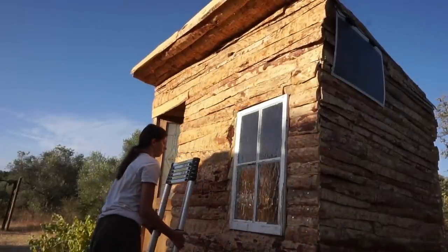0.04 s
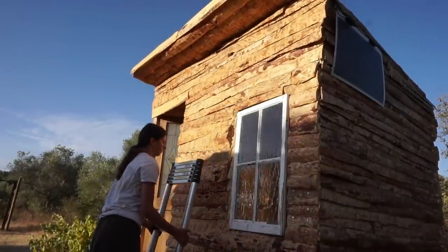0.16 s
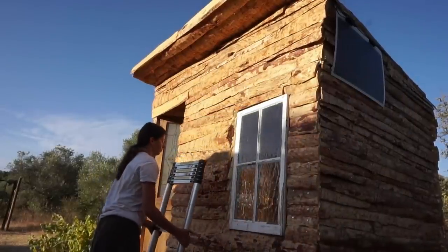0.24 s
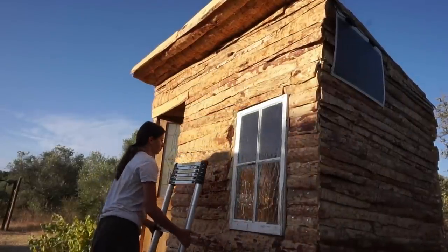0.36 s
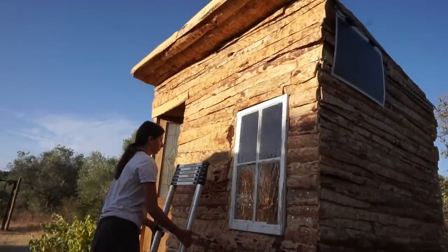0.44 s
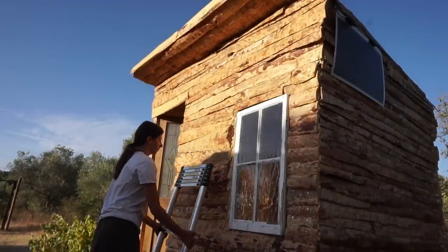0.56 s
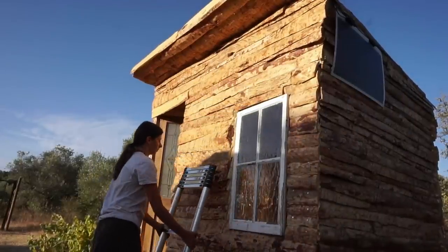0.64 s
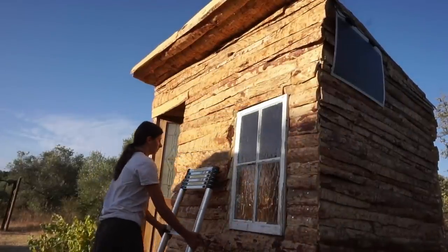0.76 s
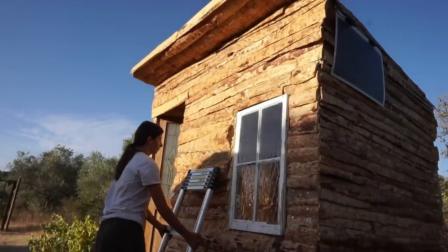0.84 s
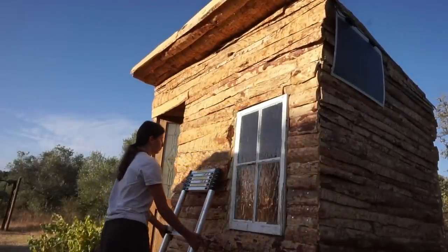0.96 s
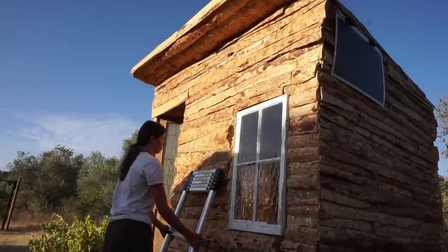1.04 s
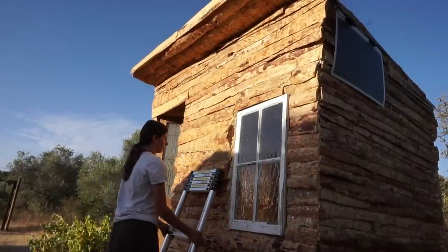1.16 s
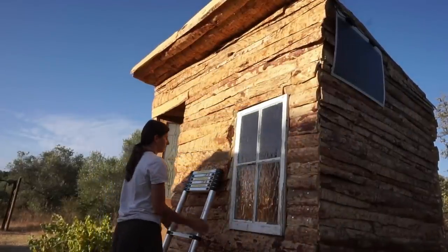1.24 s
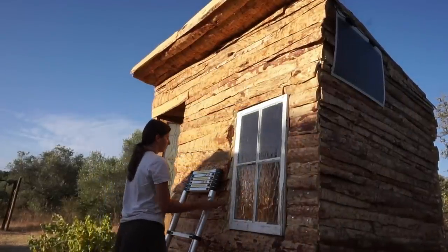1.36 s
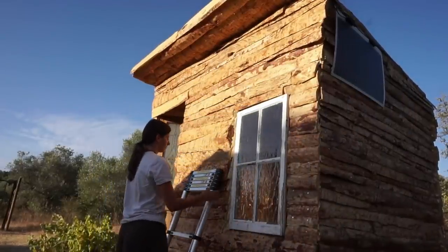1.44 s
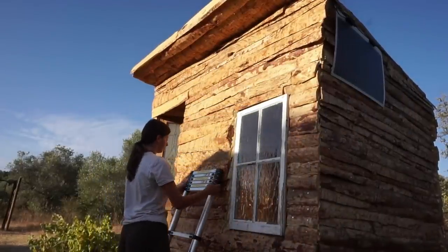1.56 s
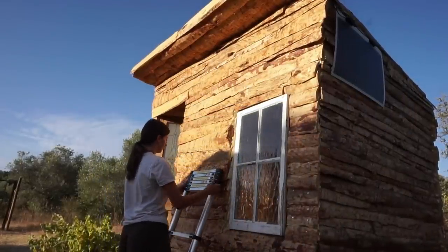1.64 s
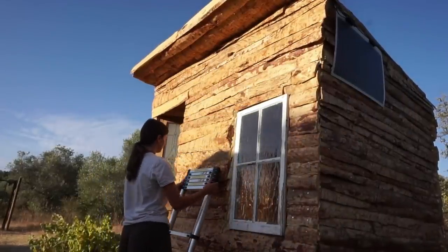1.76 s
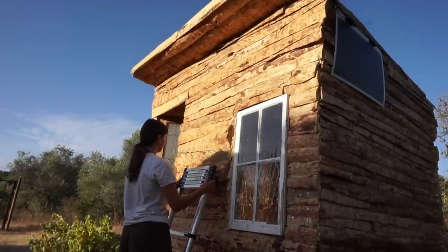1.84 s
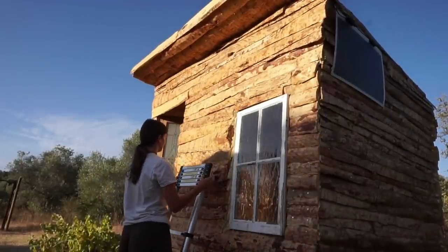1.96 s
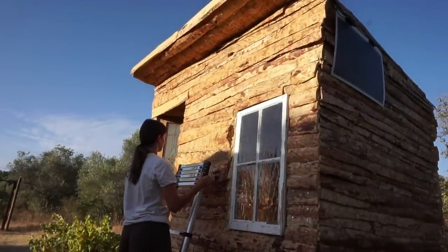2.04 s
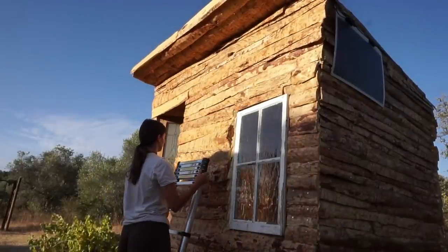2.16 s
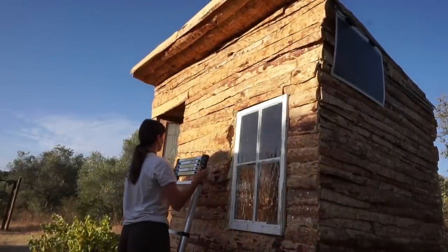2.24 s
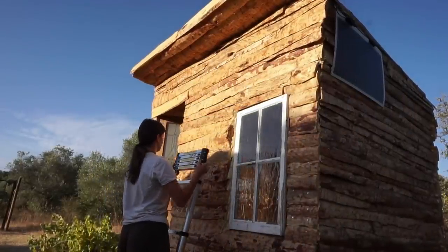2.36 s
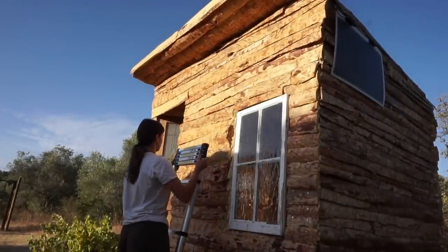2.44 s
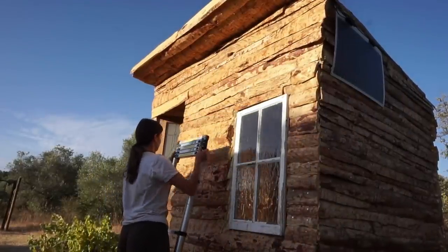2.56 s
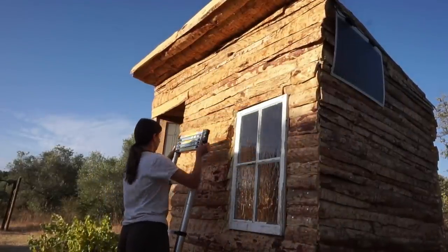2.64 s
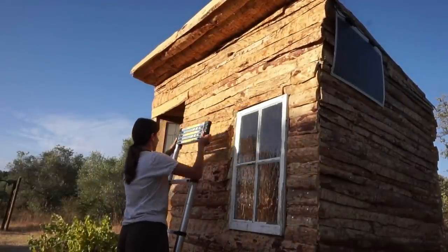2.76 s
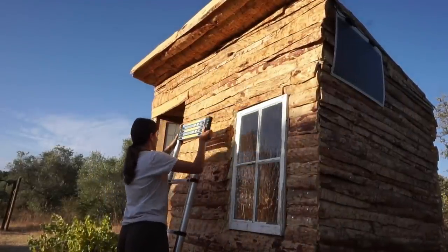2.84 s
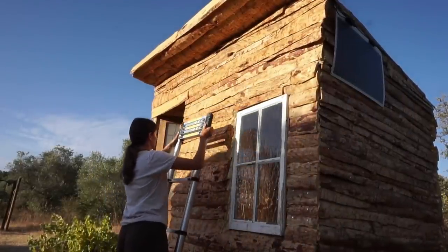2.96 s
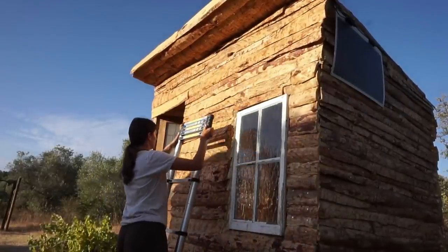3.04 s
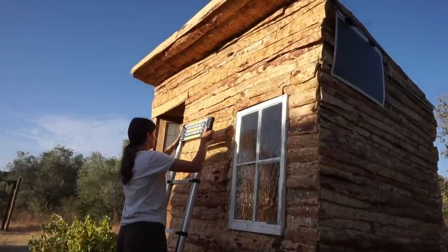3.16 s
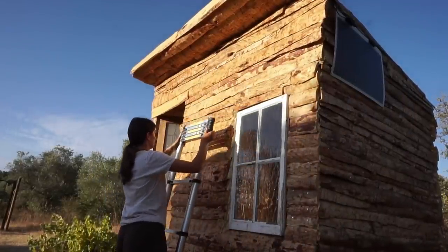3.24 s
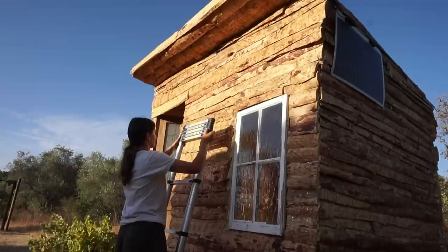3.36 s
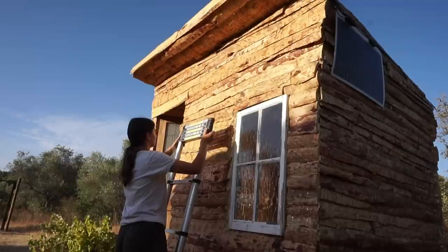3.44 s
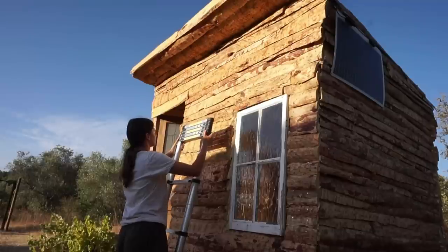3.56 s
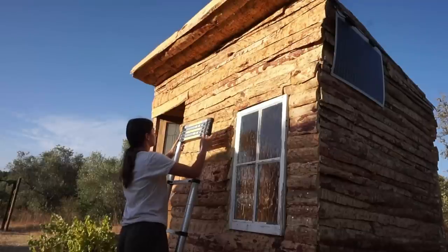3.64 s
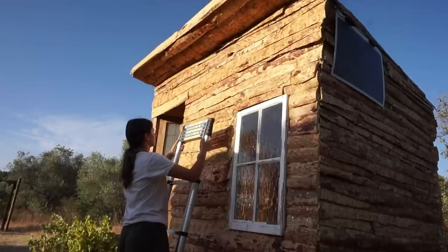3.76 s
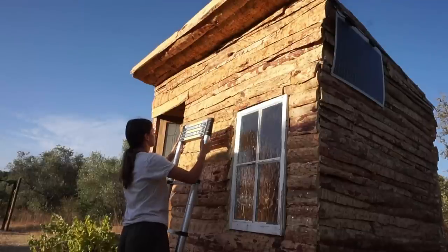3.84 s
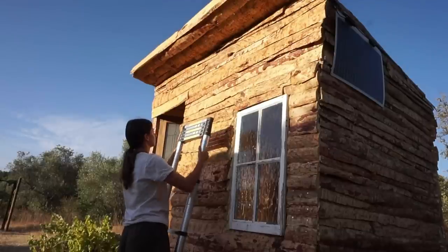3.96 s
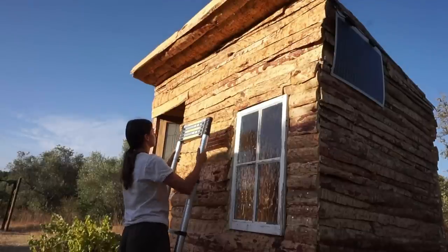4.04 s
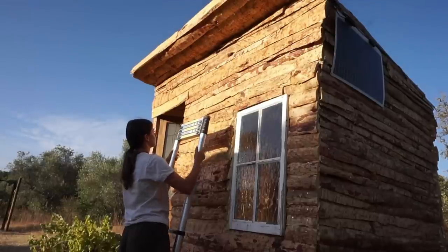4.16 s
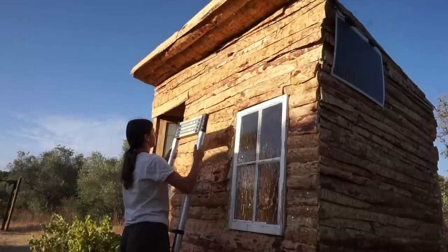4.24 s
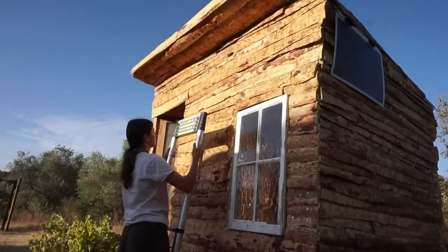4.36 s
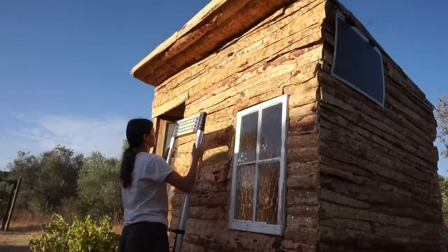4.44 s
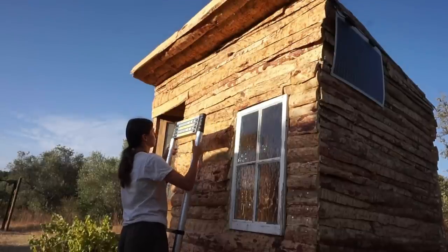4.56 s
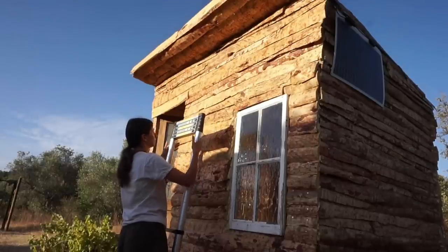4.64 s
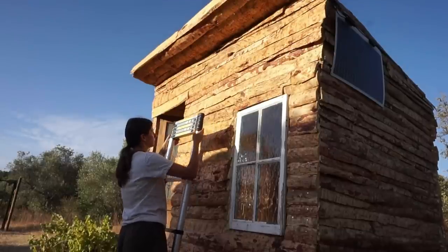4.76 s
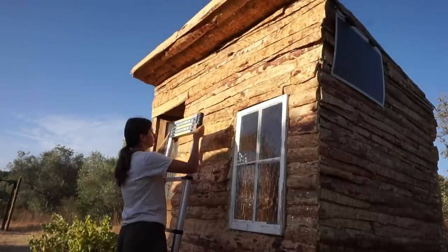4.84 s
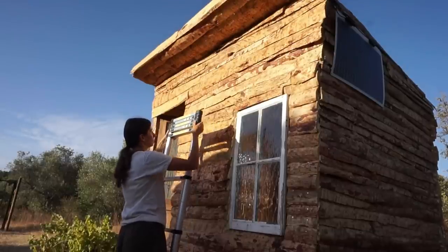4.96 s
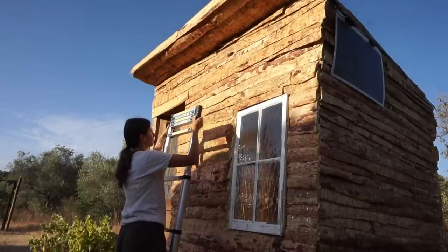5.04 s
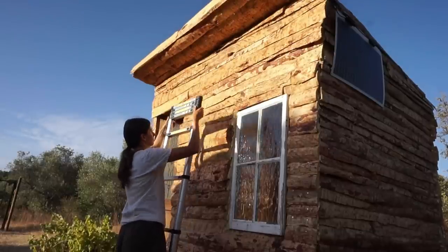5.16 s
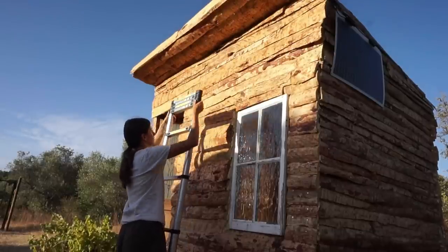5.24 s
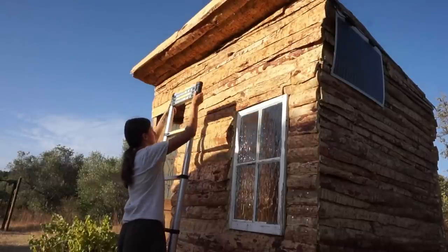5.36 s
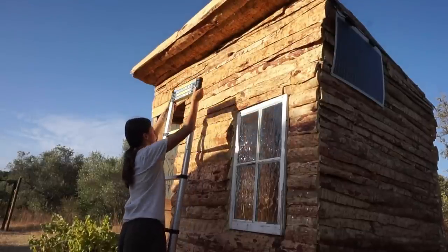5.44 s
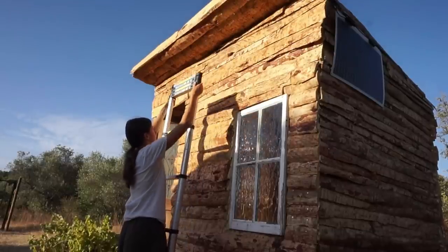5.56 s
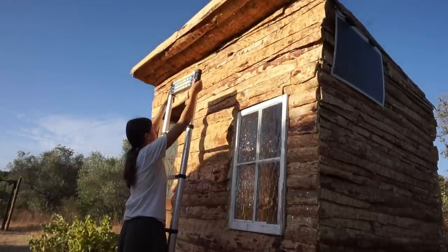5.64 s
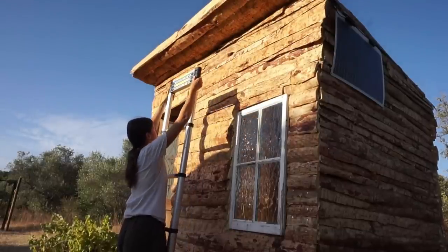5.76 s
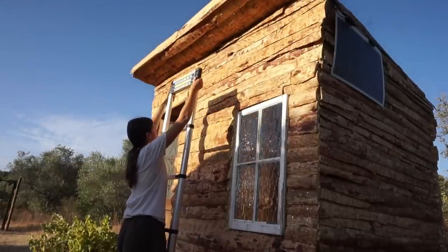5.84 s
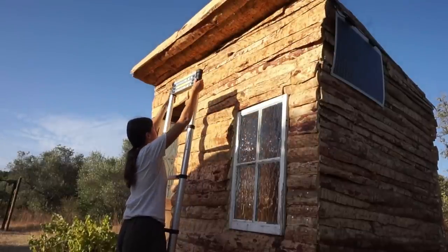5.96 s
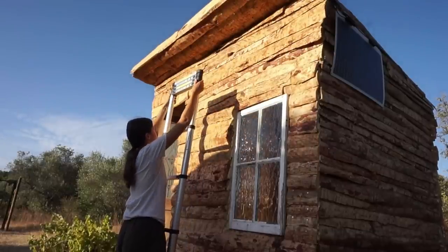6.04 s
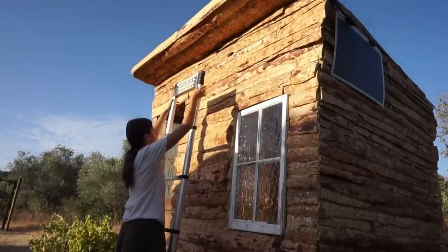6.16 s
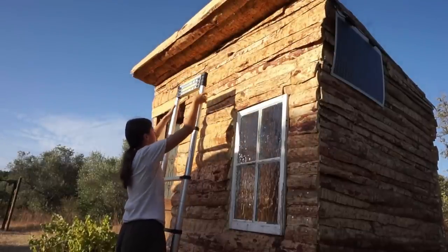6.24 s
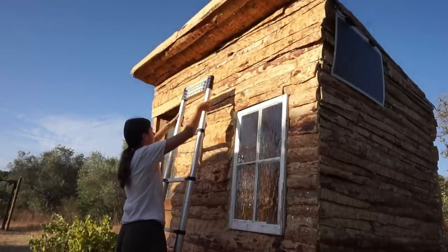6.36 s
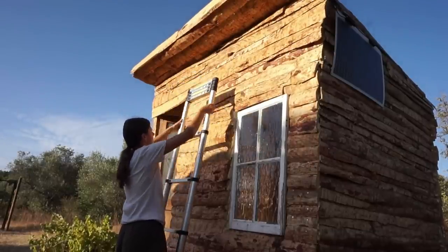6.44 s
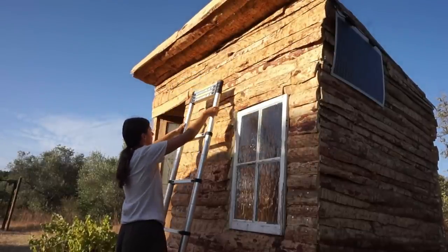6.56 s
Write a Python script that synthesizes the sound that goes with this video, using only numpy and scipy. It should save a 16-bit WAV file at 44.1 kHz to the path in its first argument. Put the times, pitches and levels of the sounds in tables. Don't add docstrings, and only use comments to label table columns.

```python
import sys
import numpy as np
from scipy import signal
from scipy.fft import rfft, irfft, next_fast_len
from scipy.io import wavfile
from scipy.ndimage import uniform_filter1d, map_coordinates

SR = 44100
rng = np.random.default_rng(int(sys.argv[2]) if len(sys.argv) > 2 else 0)


def volts(x):
    e = np.asarray(x, float) / 20
    return 10 ** e


def store_wav(level_fs):
    pcm = np.round(np.clip(np.atleast_2d(level_fs), -1, 1) * 32767)
    wavfile.write(sys.argv[1], SR, pcm.T.astype(np.int16))


N = 291060

# f/Hz, density/dB per Hz
FIELD_COLOUR = [(12, -49), (20, -25), (182, 0), (513, -5), (873, -9.5), (3160, -20), (13900, -26.5),
                (16000, -30)]
# t/s, level/dB
BREEZE = [(0, -65), (.4, -69), (1, -76), (1.3, -60.5), (1.9, -84.5), (2.95, -71), (3.05, -63.5),
          (3.9, -67.5), (5.3, -56.5), (6.1, -61), (6.6, -74)]
# f/Hz, density/dB per Hz
RUMBLE_COLOUR = [(12, -39), (20, -5.5), (65, 1), (103, 0), (171, -11), (248, -21.5), (460, -57),
                 (880, -120)]
# t/s, peak level/dB, f/Hz
EDDIES = [(0.13, -60, 70), (0.31, -45, 95), (1.342, -59, 95), (3.412, -40, 59.2), (3.469, -34.5, 76),
          (3.598, -38, 82), (3.696, -45, 95), (3.878, -50.5, 54.5), (4.018, -38, 56.1),
          (4.069, -41.5, 56.6), (4.098, -28.5, 99.5), (4.312, -33, 115), (4.366, -40, 89.4),
          (4.384, -40.5, 59.4), (4.458, -48, 115), (4.47, -37, 75.6), (4.77, -30.5, 58), (4.794, -33.5, 88),
          (5.065, -44, 73.7), (5.191, -36.5, 107), (5.223, -34, 93), (5.263, -36, 75.4), (5.489, -33, 85),
          (5.561, -30, 80), (5.597, -28.5, 85), (5.632, -30.5, 57), (5.675, -37, 58), (5.896, -40, 56.5),
          (5.912, -31.5, 128), (6.288, -46.5, 67.3)]
# f/Hz, width/Hz, level/dB
TUBE_MODES = [(747, 284, 2), (1287, 32, -5.5), (1750, 150, 4.5), (2427, 150, 12.5), (3310, 38, -13),
              (3800, 74, 8), (4690, 200, 12), (4770, 50, -41), (6700, 50, 19), (8420, 80, -23)]
# f/Hz, level/dB
METAL_COLOUR = [(60, -71), (150, -13), (300, -2), (500, 3.5), (4000, -6.5), (8000, -3.5), (12000, -8),
                (17000, -20.5)]
# t/s,
# level/dB, body/dB, edge/dB
TOUCHES = [(0.005, -48.5, 5.5, -16), (0.298, -57.5, -26, -7), (0.36, -47.5, -9, -24), (0.675, -46, -7, -29),
           (0.73, -55, -4, -13), (0.965, -55.5, -11, -14), (1.003, -59, -13, -13), (1.112, -53, -7, -6),
           (1.124, -34, 23, -10), (1.131, -37, 11.5, -16), (1.165, -49.5, 10, 14), (1.772, -57.5, -1, -22),
           (1.8, -62, -7, 8), (2.087, -56, 7, -25), (2.592, -39, 7, -12), (2.76, -58, -11, -7),
           (2.797, -61, -5, -12), (3.12, -41, -6, -18), (3.129, -46, -2, -23), (3.245, -46.5, 5, -10),
           (4.26, -54, 17.5, -22), (4.337, -33, -3, -1.5), (4.714, -47, 18, -16), (4.994, -51, 3, -28),
           (5.041, -52.5, -7, -23), (5.159, -53, 18, -12), (5.226, -52, 6, 0), (5.314, -29.5, -3, -21),
           (5.673, -56, -2, -37), (6.29, -54, 22, -11)]
# start t/s, length/s, level/dB, body/dB, edge/dB
RATTLES = [(0.275, 0.1, -52.5, 1, -22), (0.646, 0.064, -50, -21, -9.5), (0.971, 0.19, -59, -21, -14),
           (1.152, 0.022, -43, 5, 0.5), (2.585, 0.036, -38.5, 0.5, -19), (2.66, 0.021, -46, -9, 9),
           (2.929, 0.023, -40.5, -3.5, -21), (2.964, .03, -34.5, 9.5, -0.5), (2.988, 0.021, -49, 21, -12.5),
           (3.095, 0.016, -53.5, 5, -17), (3.145, 0.031, -45, 1, 3), (3.181, 0.038, -34.5, -7, -12),
           (4.305, 0.02, -39.5, 2, -1.5), (4.337, 0.034, -41.5, -1, -17), (4.561, .085, -31.5, 6.5, -15),
           (5.178, .015, -46.5, 11, -2), (5.299, 0.051, -33.5, -7, -14), (5.358, 0.078, -42, -8.5, -28),
           (5.739, 0.031, -44, -1, -20.5), (5.801, .03, -35, -8, -8), (5.821, 0.023, -41, 1, -25),
           (5.914, .02, -35.5, -4.5, -10), (5.942, .045, -27.5, 3.5, -1), (5.987, 0.019, -44, 26, -14)]
# t/s, peak level/dB, f/Hz, t60/s
FREE_RINGS = [(1.113, -46, 14400, 0.0092), (4.312, -39.5, 7140, 0.029), (5.175, -39, 8650, 0.025),
              (5.227, -57, 6360, 0.045), (1.167, -23, 5150, 0.0045), (1.165, -24.5, 4360, 0.011),
              (2.796, -51.5, 1370, .05), (2.823, -41, 1326, .05), (2.598, -46.5, 6800, 0.068),
              (2.655, -29.5, 6695, 0.0393), (2.988, -25, 2447, 0.098), (2.978, -49, 6760, .05),
              (3.18, -32.5, 6660, 0.059), (5.33, -41, 3190, 0.12), (5.395, -44.5, 4410, 0.099),
              (5.746, -48, 5630, 0.1), (5.861, -51, 2360, .12), (5.919, -36.5, 6080, 0.087),
              (5.992, -35, 2507, 0.067)]
# t/s, peak level/dB
KNOCKS = [
    (1.123, -24.5),
    (1.134, -30.5),
    (1.147, -40),
    (1.157, -31),
    (1.177, -37),
    (1.198, -45),
    (1.224, -48),
    (1.248, -50.5),
]
# f/Hz, width/Hz, level/dB
BOARD_MODES = [(212, 23, -0.5), (250, 20, 6), (342, 29, 9.5), (460, 87, -0.5), (680, 54, 3),
               (1110, 170, -15)]
# t/s, level/dB
SLIDES = [
    [(2.4, -71), (2.498, -67), (2.654, -49.5), (2.824, -61), (2.95, -61.5)],
    [(4.64, -62), (4.78, -68), (4.9, -66.5), (5.05, -81)],
    [(5.05, -71.5), (5.354, -53), (5.5, -59.5), (5.68, -73), (5.76, -74)],
]
# f/Hz, width/Hz, level/dB
RUBBED_MODES = [
    [(1332, 110, -1), (1830, 87, -6.5), (2520, 130, -5.5), (2200, 4000, -2)],
    [(4320, 120, -6), (8650, 4800, 1.5), (2960, 6600, 7)],
    [(8440, 1000, -11), (1580, 150, -2.2), (3230, 130, -17), (1780, 3500, -0.5)],
]
# t/s, level/dB, body below 1 kHz/dB, edge above 4 kHz/dB, loudest ring f/Hz
STRIKES = [(2.65, -17.5, -8, -42, 1600), (2.654, -23, 8.5, -1, 847), (2.661, -30.5, -1.5, -17, 2460),
           (2.9505, -20.5, -15, -6.5, 1290), (2.955, -17.5, -13.5, -14, 1790),
           (2.966, -25.5, -5, -7.5, 4330), (2.993, -31.5, -4, -8.5, 1500), (3.162, -36, -4, -42, 4570),
           (3.366, -40.5, 10, -10, 1620), (4.283, -42.5, 8, -6, 1700), (4.346, -35.5, -11, -20, 1040),
           (4.58, -42, 15, -11, 1790), (4.595, -33, 4, -6, 1466), (4.613, -30, 5, -11.5, 1760),
           (4.626, -33.5, 8, -5, 8800), (5.175, -40.5, 3.5, -13.5, 780), (5.351, -19.5, -2.5, -14.5, 662),
           (5.7665, -24, -6, -2.5, 2680), (5.772, -24, -10, -0.5, 4210), (5.781, -24, -9, -9.5, 1580),
           (5.795, -27.5, -8.5, -8, 3200), (5.826, -34.5, 0, -9, 5960), (5.93, -30, 1, -16, 1170),
           (5.983, -23, -11, -10.5, 1630)]
# f/Hz, t60/s
YARD_DECAY = [(300, 0.22), (2500, 0.15), (10000, 0.21)]


def unit(x):
    return x / np.sqrt(np.mean(x ** 2) + 1e-20)


def along(points, hz):
    f, v = np.transpose(points)
    return np.interp(np.log(hz + 1), np.log(f + 1), v)


def level(rows):
    s, db = np.transpose(rows)
    return volts(np.interp(np.arange(N) / SR, s, db, left=-140, right=-140))


def wobble(rate):
    knots = rng.standard_normal(int(N * rate / SR) + 4)
    return map_coordinates(knots, [np.arange(N) * rate / SR])


def resonance(f, hz, width_hz):
    return 1j * f * width_hz / (hz * hz - f * f + 1j * f * width_hz)


def noise(response):
    m = next_fast_len(N + 8192)
    spectrum = rfft(rng.standard_normal(m)) * response(np.fft.rfftfreq(m, 1 / SR))
    return unit(irfft(spectrum, m)[:N])


def place(times, sounds):
    at = np.round(np.asarray(times) * SR).astype(int)[:, None] + np.arange(sounds.shape[1])
    return np.bincount(at.ravel(), sounds.ravel(), N + SR)[:N]


def countryside():
    breeze = unit(level(BREEZE)) ** 0.055
    return volts(-61 + 0.2 * wobble(4.6)) * breeze * noise(lambda f: volts(along(FIELD_COLOUR, f)))


def wind():
    s, peak_db, hz = np.transpose(EDDIES)[:, :, None]
    since = np.arange(-SR // 8, SR // 8) / SR
    rise_s, fall_s = 0.013, 0.039
    stir = volts(peak_db - 13.5) * np.exp(-(since / np.where(since < 0, rise_s, fall_s)) ** 2)
    strength = level(BREEZE) + place(s[:, 0] - since[-1], stir)
    rumble = unit(volts(1.9 * wobble(40)) * noise(lambda f: volts(along(RUMBLE_COLOUR, f))))
    turns = np.arange(SR // 10) / SR * hz
    bumps = volts(peak_db - 7.5) * np.sin(2 * np.pi * turns) * np.exp(-((turns - .9) / 0.5) ** 2)
    return strength * rumble + place(s[:, 0] - .008, bumps)


def contacts(rows, ring_db, own_db, clump_db, attack, gain_db, pin_db):
    s, peak_db, body_db, edge_db, own_hz, t60 = np.transpose(rows)[:, :, None]
    size, lead = 4096, 128
    t, f = np.arange(size) / SR, np.fft.rfftfreq(size, 1 / SR)
    chance = rng.standard_normal((len(rows), 2, size))
    clumps = volts(clump_db * unit(uniform_filter1d(chance[:, 1], size=50)))
    impacts = chance[:, 0] * clumps

    def fade(share):
        fall = volts(-60 * (t / np.clip(share * t60, .004, .2)) ** 1.09)
        return fall * (1 - np.exp(-t / attack))

    hz, width_hz, db = np.transpose(TUBE_MODES)[:, :, None]
    modes = volts(0.26 * db) * resonance(f, hz, np.clip(width_hz, 60, 300))
    grip = rng.normal(0, 1, (len(rows), len(TUBE_MODES)))
    ring = volts(ring_db) * grip @ modes
    ring = ring + volts(own_db) * resonance(f, own_hz, 80 + .03 * own_hz)
    pins = rng.uniform(0, 1, (len(rows), 16))[:, :, None]
    for k in range(8):
        pin_hz = 2600 * 4.6 ** pins[:, k]
        ring = ring + volts(pin_db + 10.5 * pins[:, k + 8]) * resonance(f, pin_hz, 153.3)

    low, high = 1 / (1 + (f / 1000) ** 4), 1 - 1 / (1 + (f / 4300) ** 6)
    colour = volts(along(METAL_COLOUR, f) + low * (body_db - 0.5) + high * (edge_db + 1.0))
    spray = (1 - high) * rfft(impacts * fade(1.68)) + high * rfft(impacts * fade(1.0))
    delay = np.exp(-2j * np.pi * f * lead / SR)
    sound = irfft(spray * colour * (1 + ring) * delay, size)
    loud = np.sqrt(np.abs(uniform_filter1d(sound ** 2, size=250)).max(1, keepdims=True))
    return place(s[:, 0] - lead / SR, volts(peak_db + gain_db) * sound / loud)


def with_ring(rows, t60):
    hz = np.transpose(TUBE_MODES)[0][rng.integers(1, 9, len(rows))]
    return np.column_stack([rows, hz, np.full(len(rows), t60)])


def touches():
    return contacts(with_ring(TOUCHES, t60=0.043), ring_db=-2.5, own_db=3.0, clump_db=2,
                    attack=.0015, gain_db=-3.0, pin_db=-11.5)


def rattles(count=5):
    s, length, db, body_db, edge_db = np.transpose(RATTLES)[:, :, None]
    chance = rng.standard_normal((len(s), count, 4))
    way = np.abs(np.arange(count) + .25 * np.clip(chance[..., 0], -2, 2)) / count
    swell_db, fall_db, scatter_db, tone_scatter_db = 9.5, 7, 2, 3.5
    size_db = db - swell_db * (2 * way - 1) ** 2 - fall_db * way + scatter_db * chance[..., 1]
    body = body_db + tone_scatter_db * chance[..., 2]
    edge = edge_db + tone_scatter_db * chance[..., 3]
    rows = np.reshape([s + length * way, size_db, body, edge], (4, -1)).T
    return contacts(with_ring(rows, t60=0.048), ring_db=3.5, own_db=5, clump_db=-0.5,
                    attack=0.00072, gain_db=0.0, pin_db=-8)


def rings():
    s, peak_db, hz, t60 = np.transpose(FREE_RINGS)[:, :, None]
    t = np.arange(SR // 5) / SR
    unrest = unit(uniform_filter1d(rng.standard_normal((len(s), len(t))), size=250))
    tone = np.sin(2 * np.pi * hz * t + 0.26 * unrest) * volts(5.2 * unrest[:, ::-1])
    envelope = volts(peak_db - 60 * t / t60) * (1 - np.exp(-t / (0.042 * t60)))
    return place(s[:, 0], envelope * tone)


def knocks():
    s, peak_db = np.transpose(KNOCKS)[:, :, None]
    size = 8192
    t, f = np.arange(size) / SR, np.fft.rfftfreq(size, 1 / SR)
    blows = (3.8 + rng.standard_normal((len(s), size))) * volts(-60 * t / 0.019)
    wood = 0
    for k, (hz, width_hz, db) in enumerate(BOARD_MODES):
        wood = wood + (-1) ** k * volts(db) * resonance(f, hz, width_hz)
    padding = 1 / (1 + 1j * f / 1500) ** 2
    sound = irfft(rfft(blows) * wood * padding, size)
    return place(s[:, 0], volts(peak_db) * sound / np.abs(sound).max(1, keepdims=True))


def rubbed_mode(hz, width_hz, db):
    unrest_db = 4 if width_hz < 500 else 1.5
    return volts(db + unrest_db * wobble(30)) * noise(lambda f: resonance(f, hz, width_hz) ** 2)


def slide():
    total = np.zeros(N)
    for rows, modes in zip(SLIDES, RUBBED_MODES):
        friction = unit(sum(rubbed_mode(*mode) for mode in modes))
        total += volts(-1) * level(rows) * friction
    return total


def strikes():
    rows = np.column_stack([STRIKES, np.full(len(STRIKES), 0.031)])
    return contacts(rows, ring_db=4.0, own_db=9.5, clump_db=2.0, attack=0.00099, gain_db=0.42, pin_db=-2)


def yard(x):
    hz, t, z = signal.stft(rng.standard_normal(SR // 2), SR, nperseg=256)
    near = volts(-60 * t / along(YARD_DECAY, hz)[:, None])
    trees = volts(-27.5 - 60 * t / 3)
    tail = signal.istft(z * (near + trees), SR, nperseg=256)[1]
    delayed = np.pad(x, (300, 0))
    return signal.fftconvolve(delayed, tail / np.linalg.norm(tail))[:N]


def scene():
    ladder = touches() + rattles() + rings() + knocks() + strikes()
    return (countryside() + wind() + ladder + slide() + volts(-15.5) * yard(ladder))[None]


def low_pass(x):
    return signal.sosfilt(signal.butter(12, 16470, fs=SR, output="sos"), x)


def record(dry):
    band_limit = signal.cheby2(12, 50, 16550, fs=SR, output="sos")
    mix = signal.sosfilt(band_limit, dry)
    return low_pass(mix)


dry = scene()
out = record(dry)
store_wav(out)
```